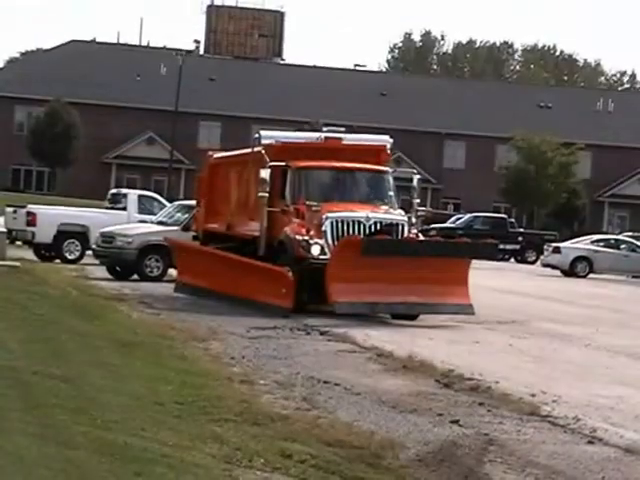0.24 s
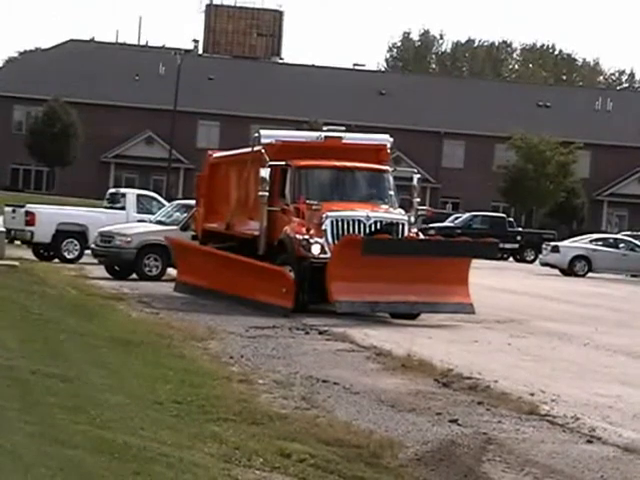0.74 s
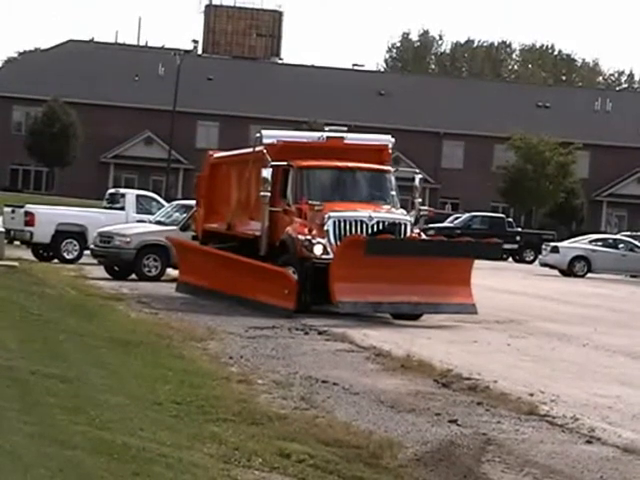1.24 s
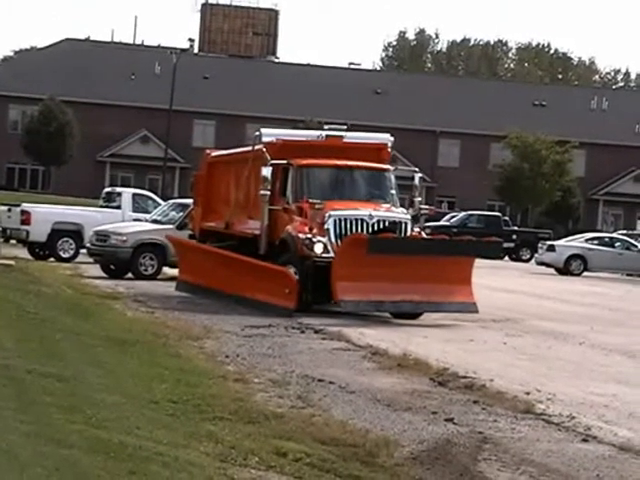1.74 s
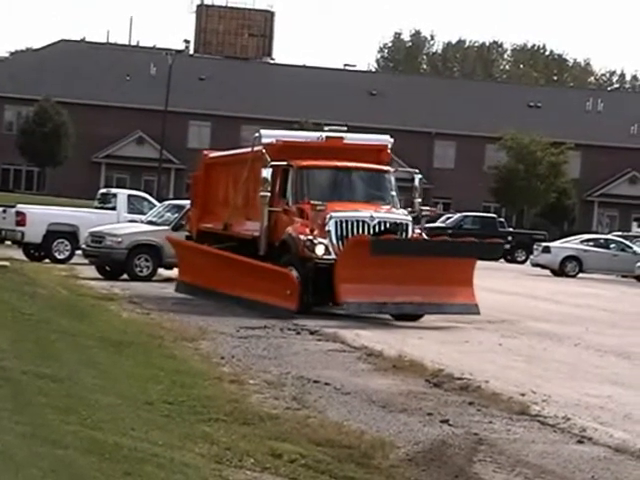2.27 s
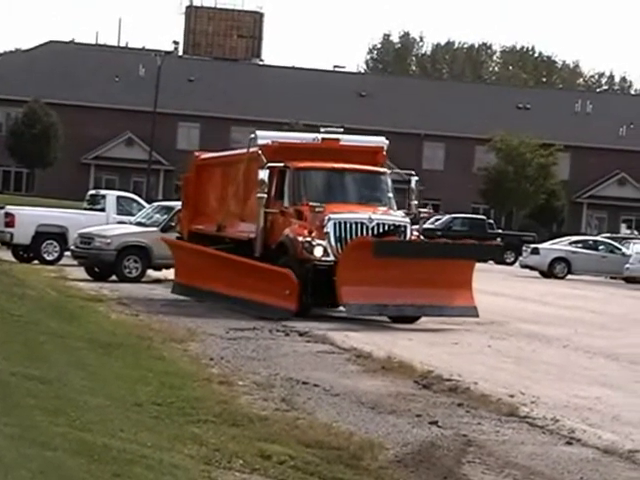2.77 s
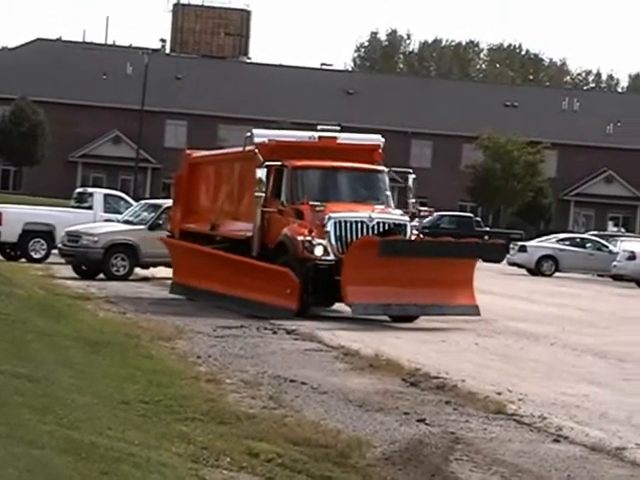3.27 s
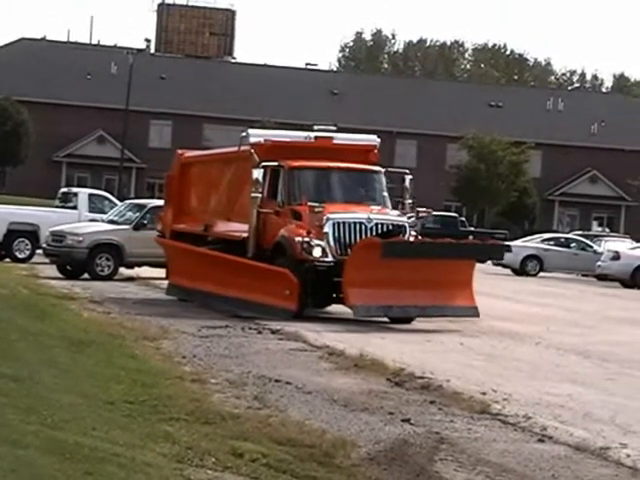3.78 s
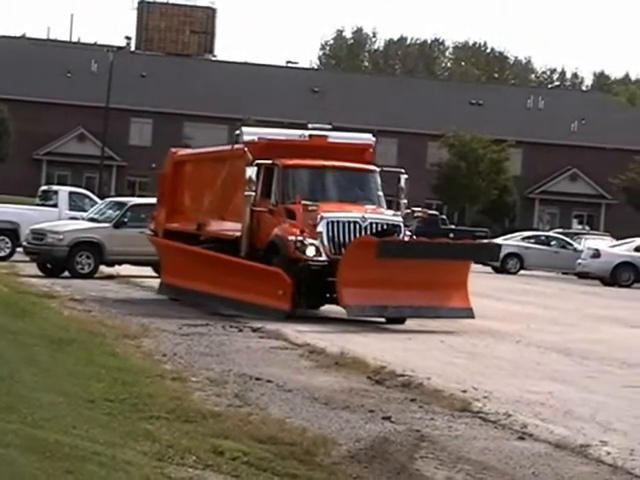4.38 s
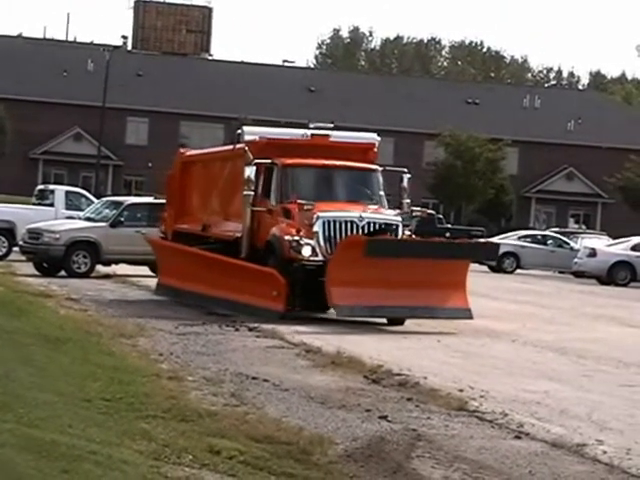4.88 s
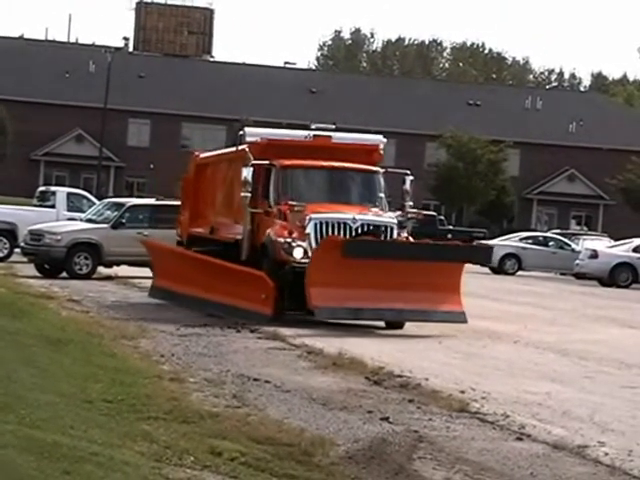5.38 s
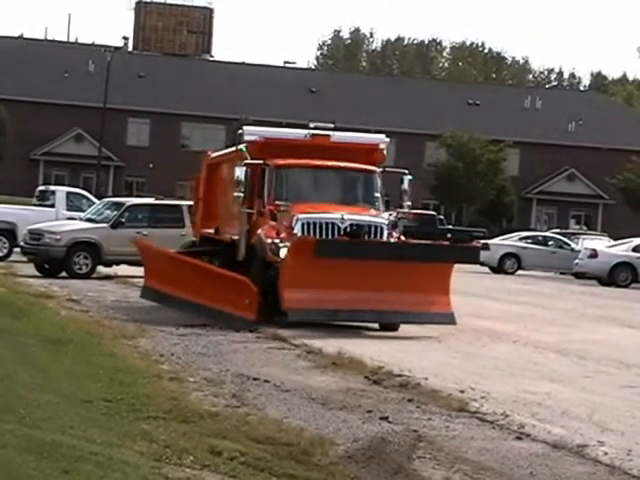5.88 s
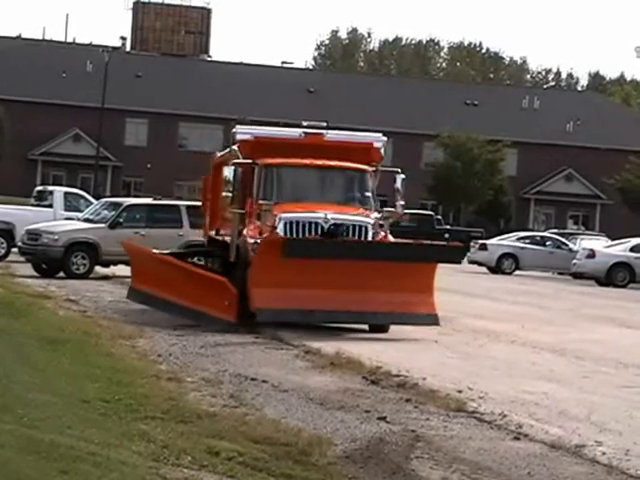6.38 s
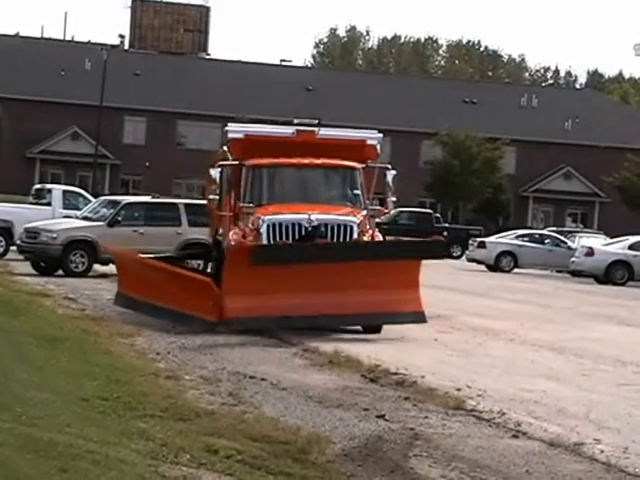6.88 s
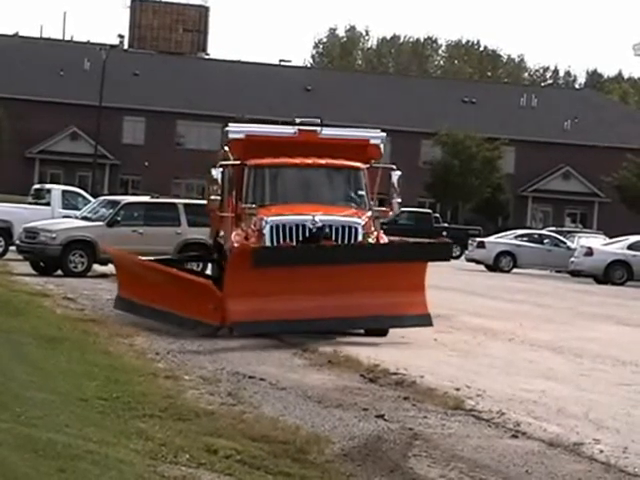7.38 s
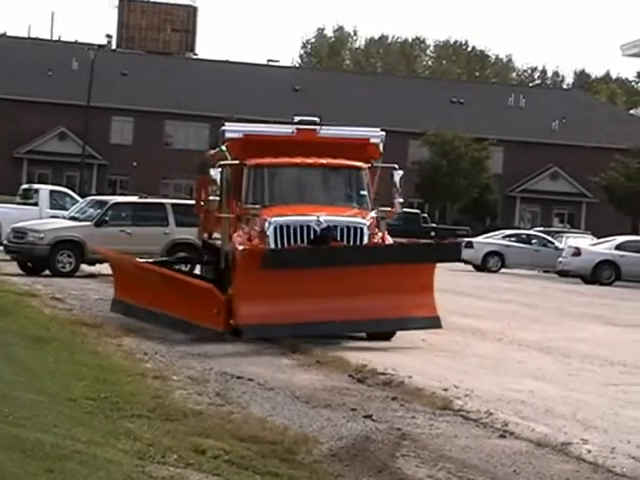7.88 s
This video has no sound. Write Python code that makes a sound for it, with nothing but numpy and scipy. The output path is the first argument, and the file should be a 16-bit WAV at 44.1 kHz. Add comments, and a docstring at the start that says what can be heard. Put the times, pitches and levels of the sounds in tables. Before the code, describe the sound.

In an open paved lot, a heavy diesel truck creeps towards a distant stereo microphone. From 0 to 2 seconds its uneven engine rumbles and clatters, with a throbbing whine near 350 hertz that drops at 1.5 and fades, while low wind gusts buffet the microphone, strongest around 1.6. Near 2.3 the revs rise; grit hisses more strongly at 3 to 4, with small stone snaps, and the metal begins to tremble. Light clanks start at 4.7. From 5.1 the broken paving sets the plough blades rattling and ringing, with a sharp stone snap at 5.2, hollow frame knocks and dump-body thumps. Revs sag towards 6 as the truck turns head-on; clanks become duller, with a clear hinge squeak at 6.4. Heavy bangs crowd 6.7 to 8 as the engine climbs again, squeaking briefly at 7.4 and 7.95. Faint machinery hum and short echoes surround it.

```python
"""On a paved lot, a diesel dump truck with a front plough and a wing plough creeps towards the listener.
Uneven firing pulses drive the six-cylinder engine's clatter and drone; a wavering drive-line whine fades.
Showers of tiny contacts make the grit under the tyres and, mostly from five seconds on, the rattle and clanks
of steel shaken by the broken edge of the paving; stick-slip noise squeaks in the hinges.
Faint machinery hums, scattered echoes widen the truck, and a breeze of shaped noise ruffles the microphone."""
import sys
import numpy as np
from scipy import signal
from scipy.fft import rfft, irfft, next_fast_len
from scipy.io import wavfile
from scipy.ndimage import uniform_filter1d, map_coordinates

SR = 44100
rng = np.random.default_rng(int(sys.argv[2]) if len(sys.argv) > 2 else 0)


def transcribe(u):
    """Save the signal u as a 16-bit wav file named by the first command-line argument.

    u: samples, shape (n,) or (channels, n), limited to [-1, 1]; the rate is SR.
    q: integer samples, one column per channel.
    """
    v = np.clip(np.atleast_2d(u).T, -1, 1)
    q = np.round(v * 32767).astype(np.int16)
    wavfile.write(sys.argv[1], SR, q)


N = 358533
TIME = np.arange(N) / SR


def undb(db):
    """Decibels to gain."""
    return 10 ** (np.asarray(db) / 20)


def unit(x):
    """Scale to rms 1."""
    return x / np.sqrt(np.mean(x ** 2) + 1e-18)


def curves(table):
    """Each column after the time, joined by straight lines."""
    seconds, *columns = np.transpose(table)
    return [np.interp(TIME, seconds, column) for column in columns]


def ramp(start, length):
    """A straight change from 0 to 1, times in seconds."""
    return np.clip((TIME - start) / max(length, .001), 0, 1)


def response(points, size):
    """Gain of a (Hz, dB) spectrum at the bins of a transform, joined along log frequency."""
    hz, db = np.transpose(points)
    bin_hz = np.arange(size // 2 + 1) * SR / size
    return undb(np.interp(np.log(bin_hz + 1), np.log(hz), db))


def colour(x, points):
    """Shape the spectrum; white input keeps its power."""
    size = next_fast_len(N + SR // 10, real=True)
    return irfft(rfft(x, size) * unit(response(points, size)), size)[..., :N]


def walk(rate):
    """Smooth random wander with a spread near 1, so many steps a second."""
    steps = rng.standard_normal(4096)
    wander = np.interp(TIME * rate, np.arange(len(steps)), steps)
    return unit(uniform_filter1d(wander, SR // 200))


def contacts(rate, spread_db):
    """Tiny impacts of uneven size at random moments, so many a second, scaled to rms 1."""
    hit = rng.random(N) < rate / SR
    sign = rng.choice([-1, 1], N)
    size = undb(spread_db * np.clip(rng.standard_normal(N), -2, 2))
    return unit(hit * sign * size)


def burst(start, rise, decay):
    """An envelope that jumps up and dies away, times in seconds."""
    age = np.clip(TIME - start, 0, 20 * decay)
    return np.minimum(age / rise, 1) * np.exp(-age / decay)


JOLT_RISE_S, JOLT_RELEASE_S = 0.00068, 0.017


def jolts(table):
    """Force of a series of jolts: attack, hold, release; overlapping ones add in power."""
    power = np.zeros(N)
    for start, db, length in table:
        tail = np.clip(TIME - start - length, 0, 20 * JOLT_RELEASE_S)
        force = undb(db) * ramp(start, JOLT_RISE_S) * np.exp(-tail / JOLT_RELEASE_S)
        power += force ** 2
    return np.sqrt(power)


def ring(x, modes, rise_s=0.00076):
    """Pass a force through the modes of a steel plate; bending waves take a moment to fill it."""
    t = TIME[:SR // 3]
    sound = np.zeros(len(t))
    for hz, width, db in modes:
        decay = np.exp(-np.pi * width * t)
        sound += undb(db) * np.sqrt(width) * decay * np.cos(2 * np.pi * hz * t)
    sound = sound * (1 - np.exp(-t / rise_s)) ** 2
    return signal.fftconvolve(x, sound / np.linalg.norm(sound))[:N]


def flex(x, bend=0.001):
    """A blade bends as it bounces, so its ringing wavers in pitch."""
    moment = np.arange(N) + bend * SR / 40 * walk(14)
    return map_coordinates(x, [moment], order=3, mode="nearest")


# Exhaust rumble, block clatter, and the rasp of hard combustion under load.
# Each row: frequency in Hz, relative level in dB per Hz.
EXHAUST_SPECTRUM = [(25, -48), (42, -20), (70, -2.5), (110, -1.5), (150, -2), (180, 3), (215, -2.5),
                    (260, -2), (330, -8.5), (420, -23.5), (800, -49), (6000, -71.5)]
CLATTER_SPECTRUM = [(150, -19), (400, -5), (620, 1.5), (900, 0.5), (1300, 1.5), (1900, -4.5), (2400, -8),
                    (3200, -9.5), (4000, -15.5), (5500, -21.5), (9000, -75)]
RASP_SPECTRUM = [(1100, -30), (1700, -5), (2300, 13.5), (3000, -2), (4500, -30)]
# levels at the starting distance and 0 dB effort; drone and rasp gain so many dB for each dB of effort
EXHAUST_DB, CLATTER_DB = -32.5, -28.5
DRONE_DB, DRONE_PER_EFFORT = -46.5, 2.3
RASP_DB, RASP_PER_EFFORT = -43.5, 4.9
# how far each firing lifts the noise of exhaust, block and rasp
KNOCK_DEPTH = .35
# gain of the grille and the body floor, in dB for each Hz of firing rate
BOOM_PER_FIRING = .22


def engine(effort_db, firing_hz, swung_away, uneven_db=3, knock_s=0.0053, throb=0.26,
           second_db=-4, third_db=-4, grille_db=-39):
    """Each firing thumps the exhaust and knocks the block; effort raises drone, clatter and rasp."""
    turns = np.cumsum(firing_hz * (1 + .008 * walk(14))) / SR
    firing = turns.astype(int)
    cylinders_db = np.array([-0.5, 2.0, -1.0, -4.5, 4.0, 1.5])
    chance_db = uneven_db * rng.standard_normal(2048)[firing]
    size = undb(cylinders_db[firing % len(cylinders_db)] + chance_db)
    knock = size * np.exp(-(turns % 1) / firing_hz / knock_s)
    lift = 1 + KNOCK_DEPTH * knock

    pulses = unit(np.diff(firing, prepend=0) * size)
    exhaust_noise = unit(lift * rng.standard_normal(N))
    exhaust = colour(unit(throb * pulses + exhaust_noise), EXHAUST_SPECTRUM)
    exhaust = exhaust * undb(EXHAUST_DB + 1.1 * walk(4.2))

    # the silencer lets only the lowest harmonics of the firing through clean
    drone = np.zeros(N)
    for harmonic, db in enumerate([0, second_db, third_db], 1):
        drone += undb(db + 0.76 * walk(12.0)) * np.sin(2 * np.pi * harmonic * turns)
    drone = unit(drone) * undb(DRONE_DB + DRONE_PER_EFFORT * effort_db)

    # once the wing blade has swung away, the second harmonic booms through the grille, more at higher firing
    # rates
    grille_gain = undb(grille_db + BOOM_PER_FIRING * (firing_hz - firing_hz[-1]))
    grille = swung_away * grille_gain * np.sqrt(2) * np.cos(4 * np.pi * turns)

    block = colour(unit(lift * contacts(14000, 3.6)), CLATTER_SPECTRUM) * undb(CLATTER_DB + effort_db)
    rasp = colour(unit(lift * contacts(9000, 2.6)), RASP_SPECTRUM)
    rasp = rasp * undb(RASP_DB + RASP_PER_EFFORT * effort_db)
    return exhaust + drone + grille + block + rasp


# Glide of the drive-line whine. Each row: time in seconds, centre pitch in Hz.
WHINE_GLIDE = [(0, 353), (.6, 350.5), (1.5, 349), (2.3, 346), (3.2, 339)]
# the whine is loudest while the gears run slack; it drops as they take up the drive, and fades throughout
WHINE_DB, WHINE_LOSS_PER_EFFORT = -28.1, 0.35
TAKE_UP_S, TAKE_UP_LENGTH_S, TAKE_UP_DROP_DB, WHINE_FADE_DB_PER_S = 1.52, 0.05, 4.5, 1.9


def whine(effort_db, second_db=-6.5, waver=0.006, flutter_db=3.66, throb_hz=8.6):
    """A throbbing drive-line tone and its octave, ragged in pitch and level, steadily dying away."""
    hz, = curves(WHINE_GLIDE)
    fade_db = TAKE_UP_DROP_DB * ramp(TAKE_UP_S, TAKE_UP_LENGTH_S) + WHINE_FADE_DB_PER_S * TIME
    phase = 2 * np.pi * np.cumsum(hz * (1 + waver * walk(45))) / SR
    throb_db = 2 * np.sin(2 * np.pi * np.cumsum(throb_hz * (1 + .12 * walk(4))) / SR)
    ragged = np.sin(phase) + .4 * walk(90) * np.cos(phase)
    fundamental = ragged * undb(throb_db + flutter_db * walk(23))
    octave = np.sin(2 * phase) * undb(second_db + flutter_db * walk(16))
    return unit(fundamental + octave) * undb(WHINE_DB - WHINE_LOSS_PER_EFFORT * effort_db - fade_db)


# Loose grit under the treads. Each row: time in seconds, relative level of its hiss in dB.
GRIT_SWELL = [(0.0, -50), (0.61, -47.5), (2.06, -47.5), (2.33, -44.5), (3.17, -42.5), (3.62, -43),
              (3.98, -41.5), (4.55, -45.5), (5.0, -45.5), (6.41, -47), (7.7, -41.5), (8.13, -43)]
# Stones cracking under a tyre. Each row: start in seconds, level in dB, decay in seconds.
STONE_SNAPS = [(3.242, -33, 0.0099), (3.872, -31, .006), (5.2136, -22, 0.0042)]
# Grit hiss and stone snap. Each row: frequency in Hz, relative level in dB per Hz.
GRIT_SPECTRUM = [(500, 9), (2000, 10), (4000, 3), (5200, -1), (5900, 0), (6300, -4.5), (7100, -3),
                 (8300, -6.5), (9200, -25), (11000, -80.5)]
SNAP_SPECTRUM = [(800, -18), (2500, -4), (7000, 10), (11000, -12)]


def tyres(hiss_db=14, crunch_db=2, pebbles=0.11):
    """Grit hisses under the treads as a shower of contacts, and now and then a stone snaps."""
    grit_db, = curves(GRIT_SWELL)
    crunch = unit(contacts(6000, crunch_db) + pebbles * contacts(130, 2.3))
    hiss = colour(crunch, GRIT_SPECTRUM) * undb(grit_db + hiss_db + 1.43 * walk(25))
    snaps = sum(undb(db) * burst(start, 0.00039, decay) for start, db, decay in STONE_SNAPS)
    return hiss + colour(snaps * rng.standard_normal(N), SNAP_SPECTRUM)


# Blades chattering in their mounts. Each row: start in seconds, relative level in dB, length in seconds.
BLADE_CLANKS = [(4.725, -21, 0.021), (4.815, -24, .02), (5.035, -18, 0.025), (5.075, -19, .045),
                (5.212, -12.5, 0.016), (5.246, -20.5, 0.059), (5.279, -14, 0.05), (5.318, -13.5, 0.015),
                (5.345, -11, 0.018), (5.368, -18.5, 0.05), (5.425, -22.5, .05), (5.476, -14, 0.027),
                (5.525, -23, 0.021), (5.606, -14, 0.028), (5.642, -24, 0.038), (5.808, -20, 0.031),
                (5.89, -21, 0.033), (5.922, -24, 0.012), (6.014, -17, .033), (6.055, -17, 0.013),
                (6.15, -18.5, 0.1), (6.322, -13.5, 0.049), (6.44, -16, 0.0094), (6.58, -31, .04),
                (6.712, -10, 0.0064), (6.742, -20, 0.052), (6.786, -9, 0.015), (7.0, -14.5, 0.043),
                (7.05, -22.5, 0.023), (7.12, -15, 0.017), (7.174, -12.5, 0.011), (7.198, -10.5, 0.021),
                (7.348, -11, 0.016), (7.38, -14, 0.064), (7.497, -13, 0.031), (7.55, -9.5, 0.028),
                (7.59, -16, 0.03), (7.617, -9.5, 0.03), (7.652, -17.5, 0.033), (7.715, -14, 0.094),
                (7.893, -14.5, 0.013), (7.953, -13, 0.0097), (7.978, -23, 0.067)]
# Moments when the blades hang free between bounces and their rattle stops.
# Each row: middle in seconds, half length in seconds.
HANGING_FREE = [(5.578, 0.029), (5.775, 0.04), (5.96, 0.029), (7.278, 0.019), (7.493, 0.0054),
                (7.82, 0.045)]
# Ringing of the blades, also heard in the wing and the knocks.
# Each row: mode frequency in Hz, width in Hz, relative level in dB.
BLADE_RING = [(177, 16, -10), (500, 25, -8), (577, 15, 0), (625, 22, -9), (829, 11, -1), (1197, 18, -7.5),
              (1251, 16, -4.5), (1603, 13, -2.5), (1712, 25, -6), (1825, 20, -10), (2053, 14, -4),
              (2122, 24, -5), (2178, 24, -6.5), (2240, 30, -8), (2448, 20, -4), (2475, 20, -6),
              (2618, 20, -3.5), (2859, 24, -4), (2950, 40, -7), (3046, 36, -6), (3240, 40, -6),
              (3306, 45, -4), (3407, 18, -10), (3567, 22, -11), (3690, 25, -13), (4238, 20, -16),
              (4450, 60, -18), (4570, 70, -13.5), (4860, 35, -18), (5280, 35, -18)]
# The short-lived crowd of plate modes, and the bright edge of a clank.
# Each row: frequency in Hz, relative level in dB per Hz.
PLATE_SPECTRUM = [(200, -57), (430, 0), (600, 2.5), (1200, 3.5), (1900, 5.5), (3000, 7), (3450, 3.5),
                  (3900, -1), (4700, -8.5), (6000, -27.5), (8500, -19), (10500, -35)]
EDGE_SPECTRUM = [(1500, 9.5), (3000, -1), (5200, 11), (6300, 0.5), (7600, -7.5), (9000, -40), (11000, -31)]
# relative level before the wing blade swings away, and change once it has
RATTLE_DB, RATTLE_SWING_DB = -32, 5.5
EDGE_DB, EDGE_SWING_DB = -13.5, -32


def ploughs(shake_db, swung_away, ring_db=-3.0, plate_db=-4.0, clank_db=-6, crash_db=-3.0):
    """Loose blades rattle with the ground; each clank is a chatter of contacts, duller once the wing blade has
    swung away."""
    clank = jolts(BLADE_CLANKS)
    free = [np.exp(-((TIME - middle) / half) ** 2) for middle, half in HANGING_FREE]
    touching = 1 - np.max(free, axis=0)
    rattle_db = RATTLE_DB + shake_db + RATTLE_SWING_DB * swung_away + 0.73 * walk(30)
    rattle = contacts(2200, 0.29) * touching * undb(rattle_db)
    blows = contacts(3500, 0.86) * clank * undb(clank_db)
    # a few modes ring on; the crowd of other plate modes dies at once
    ringing = undb(ring_db) * flex(ring(rattle + 0.84 * blows, BLADE_RING))
    plate = colour(undb(plate_db) * rattle + undb(crash_db) * blows, PLATE_SPECTRUM)
    edge = contacts(4400, 1.3) * clank * undb(EDGE_DB + EDGE_SWING_DB * swung_away)
    return ringing + plate + colour(edge, EDGE_SPECTRUM)


# Road vibration reaching the wing blade. Each row: frequency in Hz, relative level in dB per Hz.
WING_FORCE = [(300, -32), (480, 1), (600, 4), (830, -3), (1300, -27.5), (2500, -44.5)]
GROAN_DB, GROAN_SWING_DB = -35.5, -3  # before the wing blade swings away, at the starting distance, and change once it has


def wing(shake_db, swung_away):
    """Road vibration keeps the lower modes of the long wing blade sounding."""
    vibration = colour(rng.standard_normal(N), WING_FORCE)
    groan = flex(ring(vibration, BLADE_RING))
    return unit(groan) * undb(GROAN_DB + shake_db + GROAN_SWING_DB * swung_away)


# Steel rubbing on a hinge pin.
# Each row: start in seconds, pitch in Hz, width in Hz, relative level in dB, decay in seconds.
HINGE_SQUEAKS = [(4.9, 4850, 400, -41, .08), (5.038, 4950, 340, -26, 0.026), (5.34, 5300, 400, -35, .1),
                 (6.03, 2130, 160, -30, 0.081), (6.31, 2110, 110, -22.5, 0.03),
                 (6.401, 2140, 170, -12.5, 0.032), (6.438, 2150, 170, -22, .034),
                 (6.72, 2820, 200, -22, 0.052), (7.356, 1840, 140, -20, 0.038),
                 (7.952, 2900, 600, -17, .034)]
HINGE_TOP_HZ = 6040  # the hinge plate radiates little above this


def hinges(octave_db=-16, grip=0.48):
    """A pin sticks and slips, ringing the hinge at a ragged pitch and its octave; friction evens out the slips."""
    squeaks, slips = np.zeros(N), contacts(9000, 0.72)
    for start, hz, width, db, decay in HINGE_SQUEAKS:
        for k, partial_db in enumerate([0, octave_db], 1):
            edges = [k * (hz - width / 2), k * (hz + width / 2)]
            band = signal.butter(2, edges, "bandpass", fs=SR, output="sos")
            tone = unit(signal.sosfilt(band, slips))
            power = uniform_filter1d(tone ** 2, size=64) + .01
            even_tone = unit(tone / power ** grip)
            squeaks += undb(db + partial_db) * burst(start, 0.0047, decay) * even_tone
    return signal.sosfilt(signal.butter(6, HINGE_TOP_HZ, fs=SR, output="sos"), squeaks)


# The empty dump body bumping on the frame.
# Each row: start in seconds, relative level in dB, length of the shudder in seconds.
BODY_BUMPS = [(.16, -20, .14), (4.66, -20, .25), (5.315, -9.5, 0.02), (5.338, -9.5, .02),
              (5.482, -15, 0.033), (5.616, -11, .035), (5.693, -15, 0.028), (5.9, -12, 0.06),
              (6.331, -9, 0.005), (6.723, -12.5, 0.015), (7.174, -6.5, .025), (7.22, -12.5, 0.05),
              (7.275, -9.5, 0.05), (7.35, -17, .08), (7.52, -15, .01), (7.552, -8.5, 0.005),
              (7.625, -19, .02), (7.751, -20, 0.0045), (7.909, -19, 0.004)]
# Ringing of the dump body. Each row: mode frequency in Hz, width in Hz, relative level in dB.
BODY_RING = [(150, 36, -6.5), (180, 20, 1), (256, 34, -3), (318, 70, -12)]
# Drumming and shudder of the body. Each row: frequency in Hz, relative level in dB per Hz.
BODY_SPECTRUM = [(40, -33), (110, -5.5), (165, 8), (250, 7.5), (330, 1.5), (500, -29), (1200, -59),
                 (5000, -68.5)]
DRUM_DB, DRUM_SWING_DB = -30.5, -7  # before the wing blade swings away, at the starting distance, and change once it has


def chassis(shake_db, swung_away, bump_db=18, shudder_db=-10):
    """The empty dump body drums on rough ground; each bump rings it and leaves it shuddering."""
    drumming = undb(DRUM_DB + shake_db + DRUM_SWING_DB * swung_away)
    shudder = undb(shudder_db) * jolts(BODY_BUMPS)
    body = colour(contacts(2000, 6.3) * np.hypot(drumming, shudder), BODY_SPECTRUM)
    bumps = np.zeros(N)
    for start, db, _ in BODY_BUMPS:
        bumps[int(start * SR)] = undb(db + bump_db)
    return body + ring(bumps, BODY_RING, rise_s=0.0047)


# Boom of the dump body's floor. Each row: mode frequency in Hz, width in Hz, relative level in dB.
FLOOR_MODE = [(178.3, 21.6, 0)]
BOOM_DB, BOOM_REFERENCE_HZ = -35.5, 66  # level at this firing rate and 0 dB of shaking


def boom(shake_db, firing_hz):
    """The floor of the dump body hums at its own pitch, more strongly as the engine speeds up."""
    hum_of_floor = unit(ring(rng.standard_normal(N), FLOOR_MODE))
    return hum_of_floor * undb(BOOM_DB + shake_db + BOOM_PER_FIRING * (firing_hz - BOOM_REFERENCE_HZ))


# Hollow knocks in the frame.
# Each row: start in seconds, relative level in dB, length in seconds, share passed on to the blades in dB.
FRAME_KNOCKS = [(5.078, -30, 0.02, 0), (5.342, -22, .015, -10), (5.445, -25, 0.025, 0),
                (5.51, -26, 0.058, -2), (5.655, -26, 0.046, -2), (5.715, -25.5, 0.011, 0),
                (5.82, -26, 0.047, -5), (5.904, -25.5, 0.017, -6), (6.072, -27, .025, -1),
                (6.162, -22, 0.014, 0), (6.198, -21, 0.0088, 0), (6.329, -19.5, 0.0078, 3),
                (6.362, -24, 0.03, 4), (6.797, -24.5, .006, -6), (7.174, -20, 0.045, -12),
                (7.24, -25, .025, -14), (7.274, -19.5, .012, -16), (7.294, -17.5, 0.008, -15),
                (7.357, -22, 0.0063, -12), (7.508, -22, 0.0071, -4)]
# Hollow colour of the frame. Each row: frequency in Hz, relative level in dB per Hz.
FRAME_SPECTRUM = [(120, -23.5), (220, -6), (350, -4), (520, 1.5), (900, 0.5), (1300, -5.5), (3000, -31),
                  (9000, -68)]


def knocks(hollow_db=-1):
    """The frame knocks hollowly and passes part of each blow on to the lowest modes of the blades."""
    chatter = contacts(5500, 5.6)
    on_frame = jolts([(start, db, length) for start, db, length, _ in FRAME_KNOCKS])
    on_blades = jolts([(start, db + share_db, length) for start, db, length, share_db in FRAME_KNOCKS])
    hollow = undb(hollow_db) * colour(chatter * on_frame, FRAME_SPECTRUM)
    return hollow + ring(chatter * on_blades, BLADE_RING[:7])


# Steady machinery round the building. Each row: pitch in Hz, middle level in dB.
MACHINE_TONES = [(47, -58.5), (88.8, -45.5), (135.3, -42.5)]


def hum():
    """Faint tones of steady pitch that swell and sink at random."""
    tones = np.zeros(N)
    for hz, db in MACHINE_TONES:
        tones += np.sqrt(2) * undb(db + 1.9 * walk(3.3)) * np.sin(2 * np.pi * hz * TIME)
    return tones


# Gusts on the microphone. Each row: peak in seconds, level in dB, time to swell or sink in seconds.
WIND_GUSTS = [(.35, -22, 0.5), (1.2, -20.5, 0.21), (1.6, -16.5, 0.17), (2.17, -29, 0.14), (2.75, -41, 0.27),
              (3.78, -31.5, 0.15), (7.15, -32, 0.28), (7.85, -40, 0.46)]
# Wind noise. Each row: frequency in Hz, relative level in dB per Hz.
WIND_SPECTRUM = [(22, -42), (40, -12), (65, -7), (100, 8), (150, 8.5), (230, 1), (350, -6.5), (700, -24),
                 (2000, -67.5)]
LULL_DB = -50


def breeze(common_db=-11, left_lean=0.082):
    """Gust eddies push one microphone port while they pull the other, with a little common to both."""
    strength = undb(LULL_DB)
    for peak, db, swell in WIND_GUSTS:
        strength = strength + undb(db) * np.exp(-((TIME - peak) / swell) ** 2)
    opposed, common = colour(rng.standard_normal((2, N)), WIND_SPECTRUM) * strength
    return opposed * np.array([[1 + left_lean], [left_lean - 1]]) + undb(common_db) * common


# Share of the sound scattered back by house fronts and parked cars.
# Each row: frequency in Hz, relative level in dB.
SCATTER_SPECTRUM = [(60, -22), (150, -35), (300, -15), (550, -10), (2000, -10), (5000, -8.5), (9000, -13)]


def lot(x, echo_db, t60=0.031):
    """Scattered echoes, opposite in the two channels, arrive from the sides and widen the sound."""
    t = TIME[:SR // 2]
    echoes = rng.standard_normal(len(t)) * undb(-60 * t / t60) * (t > .004)
    echoes = echoes / np.linalg.norm(echoes)
    size = next_fast_len(N + SR, real=True)
    spectrum = rfft(x, size) * rfft(echoes, size) * response(SCATTER_SPECTRUM, size)
    side = undb(echo_db) * irfft(spectrum, size)[:N]
    return np.array([x + side, x - side])


START_M, CREEP_M_S = 41.5, 0.86  # distance at the start, creeping speed


def nearness():
    """Gain in dB as the truck creeps closer: level rises as distance shrinks."""
    return 20 * np.log10(START_M / np.maximum(START_M - CREEP_M_S * TIME, 1))


# The driver's foot. Each row: time in seconds, firing rate in Hz, engine effort in dB.
DRIVER_FOOT = [(0, 69.6, -1), (.8, 68.8, 1.5), (1.75, 66.64, -1.5), (2.35, 77.5, 1.5), (3.0, 75.6, 2.5),
               (3.35, 77.3, 1), (4.4, 77.4, 0.5), (5.2, 71.8, 1), (5.95, 65.5, 0.5), (6.2, 64.3, 0.5),
               (7.1, 68.44, 2.5), (7.7, 79.5, 2.5), (8.13, 82, 2.2)]
# Smooth paving, one rough patch, then the broken edge. Each row: time in seconds, roughness in dB.
PAVING = [(0, -24.5), (3.4, -9), (4, -1.5), (4.6, -6), (4.98, -6), (5.12, 1), (5.5, 2.5), (8.13, 0)]
# the wing blade swings out of view
SWING_START_S, SWING_LENGTH_S = 5.99, 0.13
# echoes of the running gear at the starting distance, and of the blades, which face the listener
RUNNING_ECHO_DB, STEEL_ECHO_DB = 0, -13


def scene():
    """The truck nears and its wing blade swings away: throttle drives the engine, ground shakes the steel, wind
    blows on top."""
    firing_hz, effort_db = curves(DRIVER_FOOT)
    ground_db, = curves(PAVING)
    near_db, swung_away = nearness(), ramp(SWING_START_S, SWING_LENGTH_S)
    shake_db = ground_db + near_db
    running = engine(effort_db, firing_hz, swung_away) * undb(near_db) + whine(effort_db) + tyres()
    blades = ploughs(shake_db, swung_away) + wing(shake_db, swung_away) + hinges()
    body = chassis(shake_db, swung_away) + boom(shake_db, firing_hz) + knocks()
    # the echoes of the engine stay as they are while its direct sound grows
    near_lot = lot(running + hum(), RUNNING_ECHO_DB - near_db)
    return near_lot + lot(blades + body, STEEL_ECHO_DB) + breeze()


TOP_HZ = 10000


def record(dry):
    """Cut the deepest bass, round the highest peaks by soft saturation, and cut off the top."""
    bass_cut = signal.sosfilt(signal.butter(3, 36, "highpass", fs=SR, output="sos"), dry)
    rounded = np.tanh(.8 * bass_cut) / .8
    return signal.sosfilt(signal.ellip(8, .2, 70, TOP_HZ, fs=SR, output="sos"), rounded)


dry = scene()
out = record(dry)
transcribe(out)
```